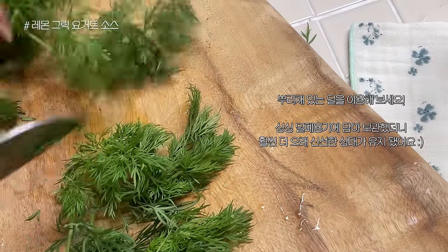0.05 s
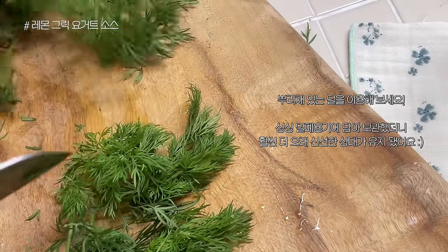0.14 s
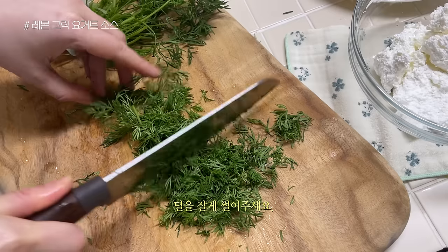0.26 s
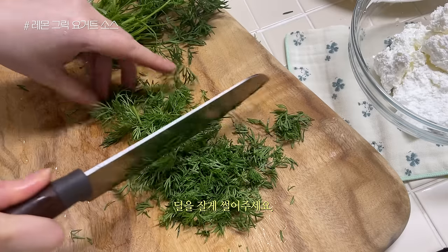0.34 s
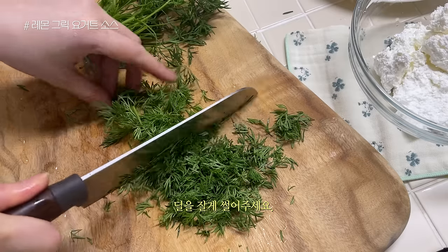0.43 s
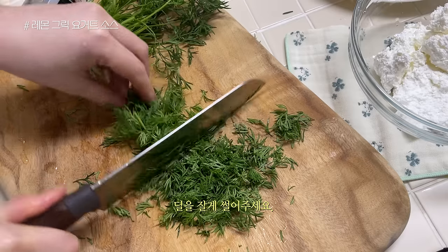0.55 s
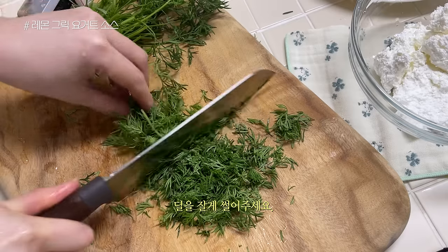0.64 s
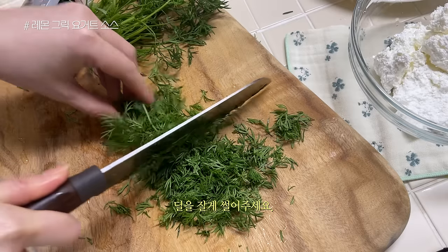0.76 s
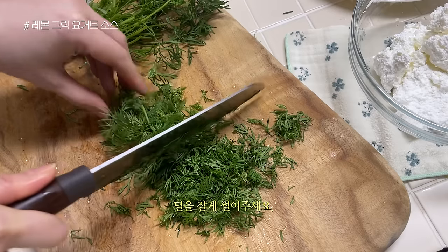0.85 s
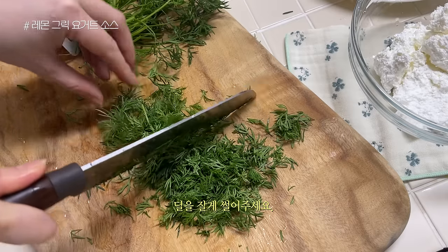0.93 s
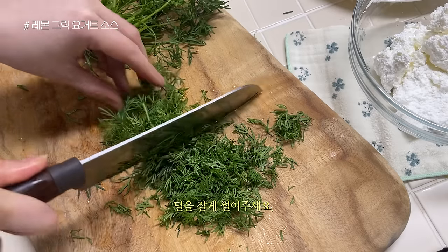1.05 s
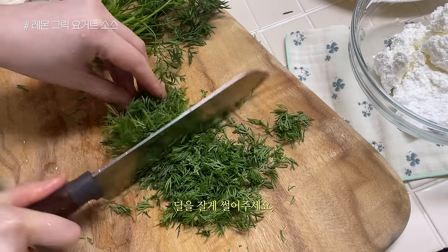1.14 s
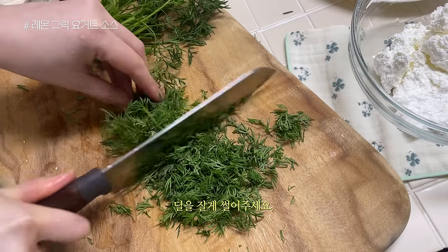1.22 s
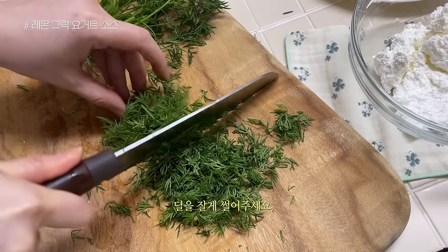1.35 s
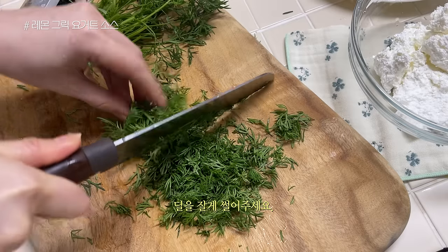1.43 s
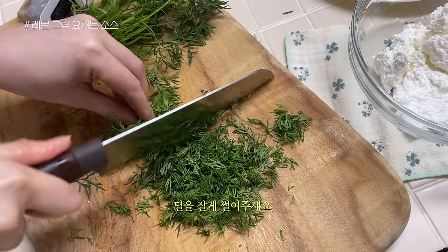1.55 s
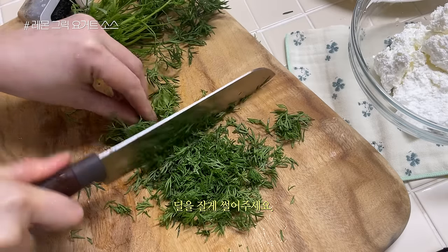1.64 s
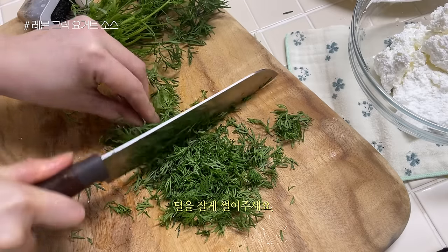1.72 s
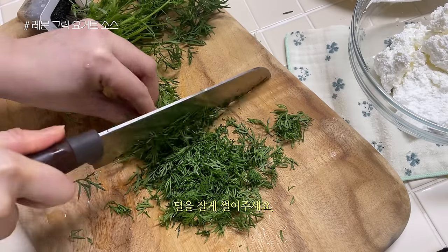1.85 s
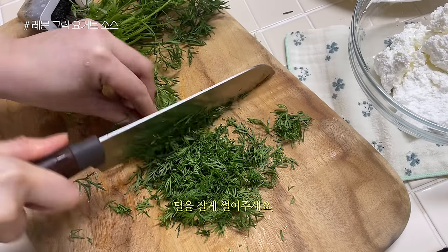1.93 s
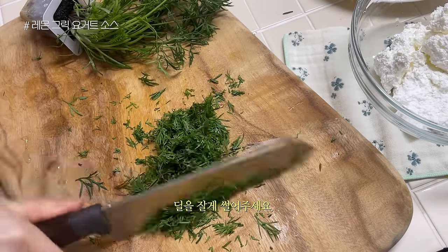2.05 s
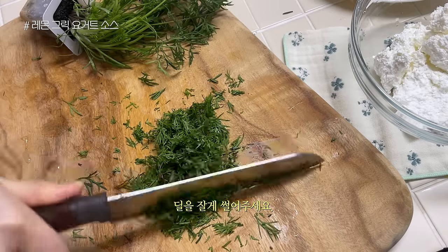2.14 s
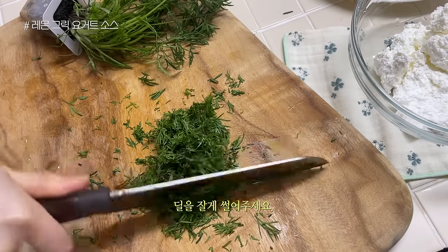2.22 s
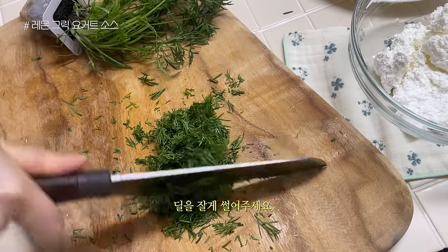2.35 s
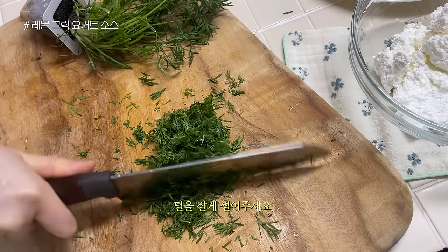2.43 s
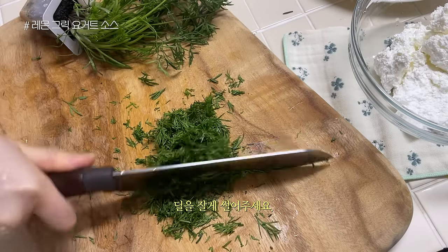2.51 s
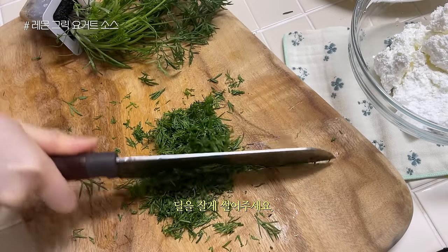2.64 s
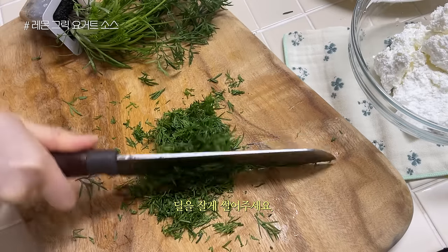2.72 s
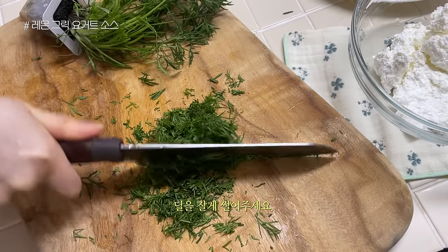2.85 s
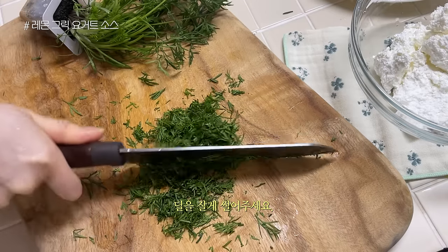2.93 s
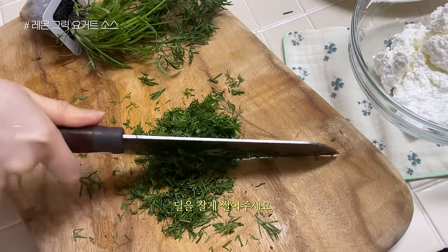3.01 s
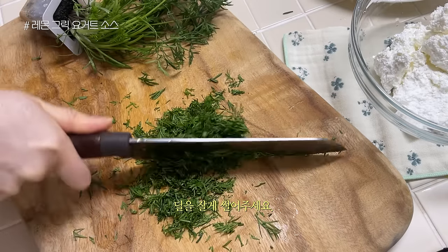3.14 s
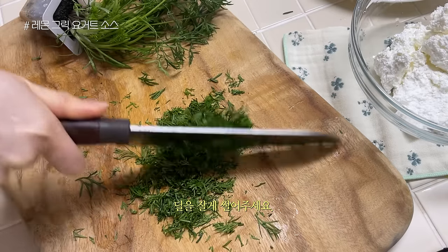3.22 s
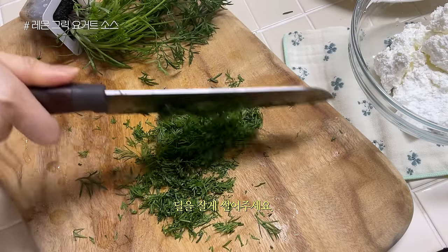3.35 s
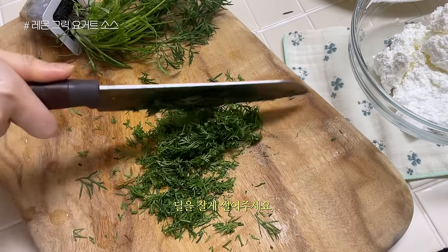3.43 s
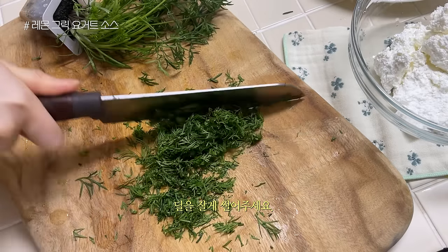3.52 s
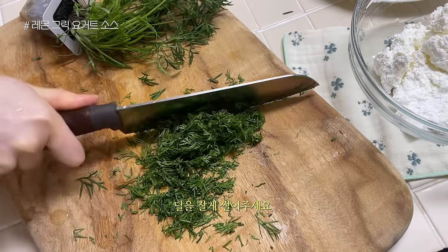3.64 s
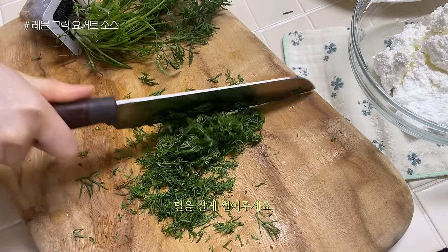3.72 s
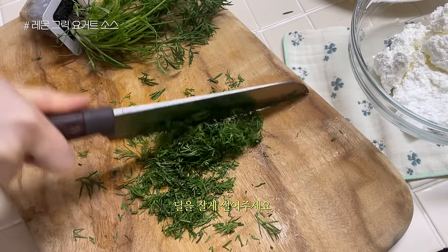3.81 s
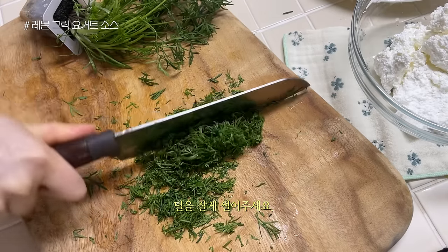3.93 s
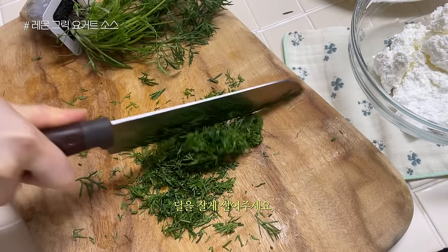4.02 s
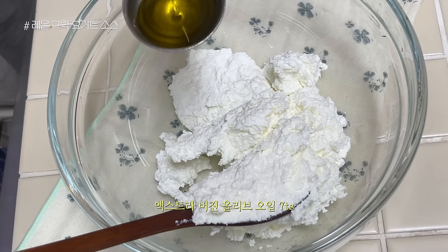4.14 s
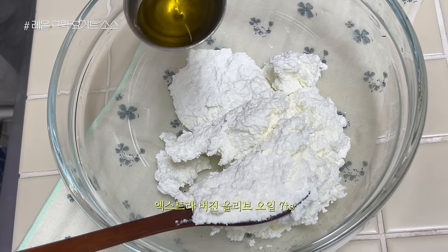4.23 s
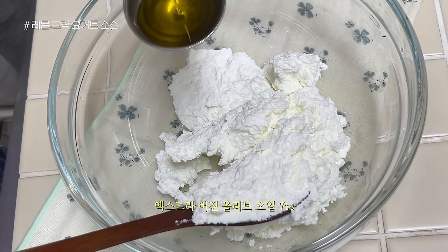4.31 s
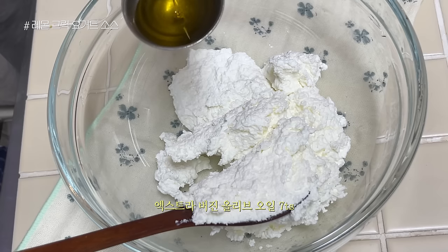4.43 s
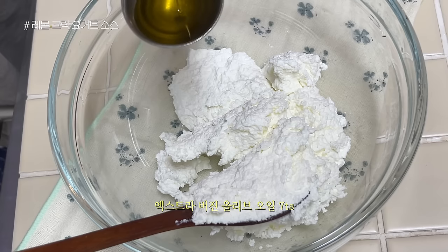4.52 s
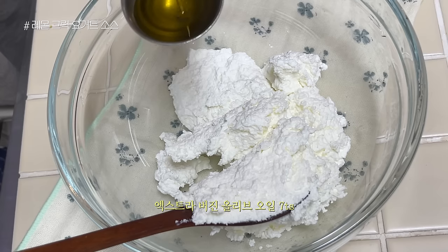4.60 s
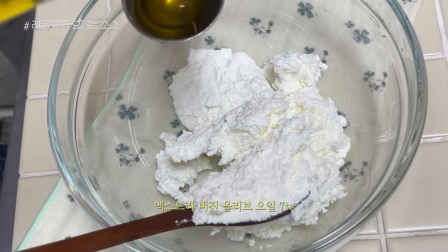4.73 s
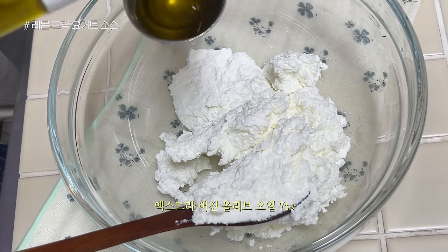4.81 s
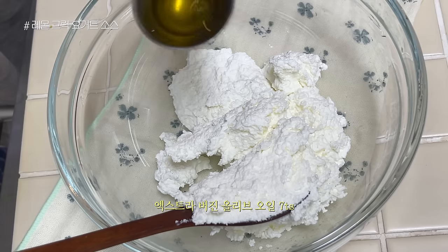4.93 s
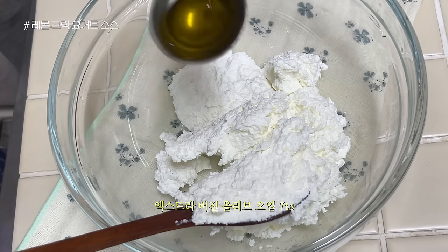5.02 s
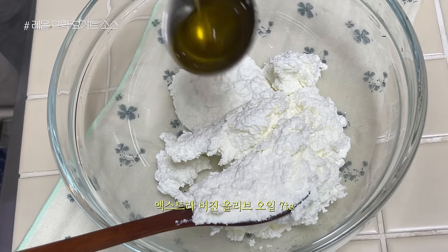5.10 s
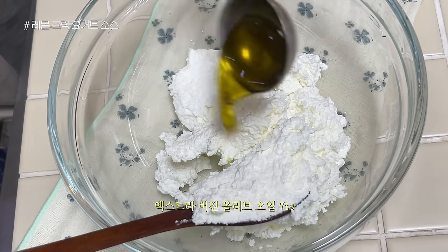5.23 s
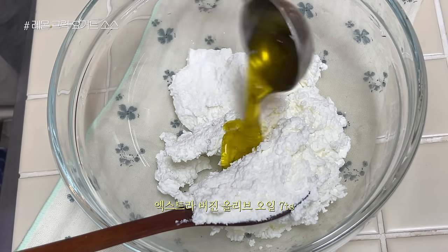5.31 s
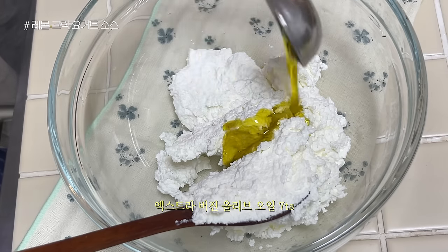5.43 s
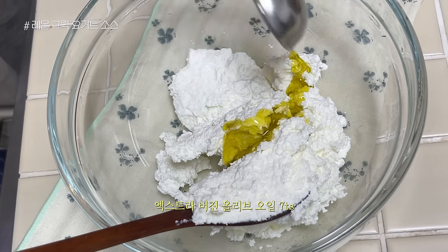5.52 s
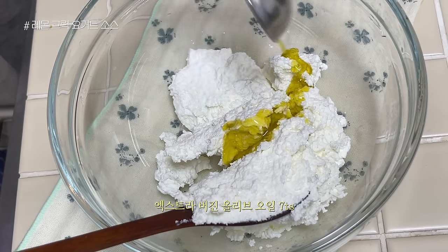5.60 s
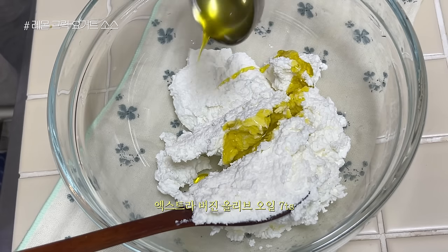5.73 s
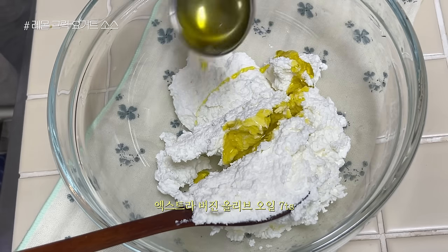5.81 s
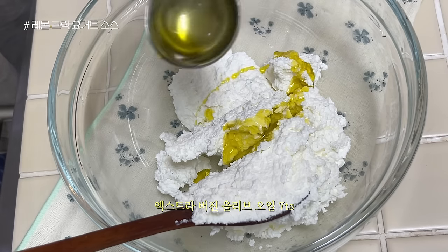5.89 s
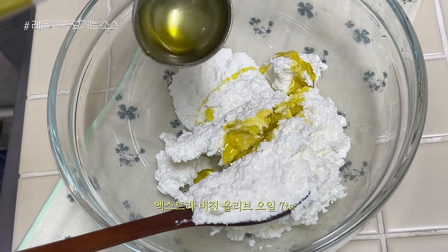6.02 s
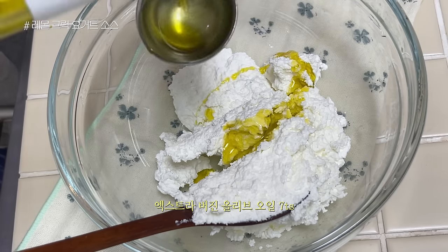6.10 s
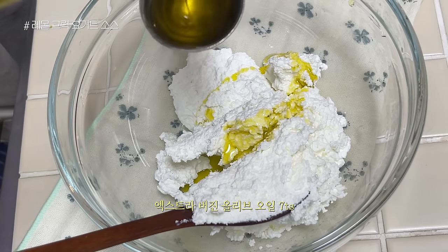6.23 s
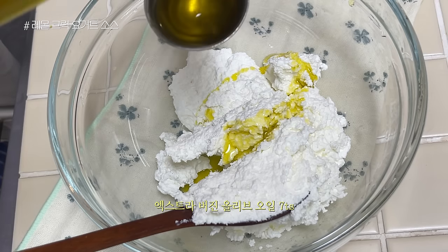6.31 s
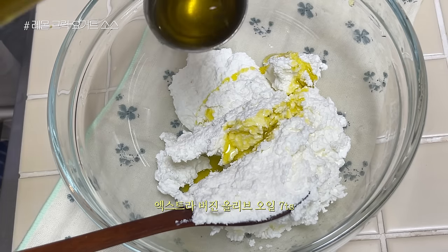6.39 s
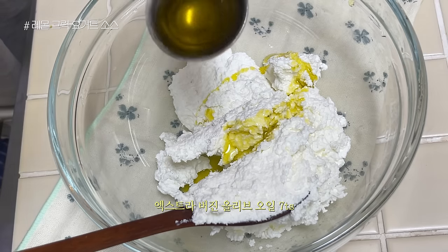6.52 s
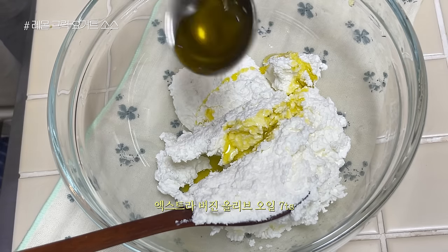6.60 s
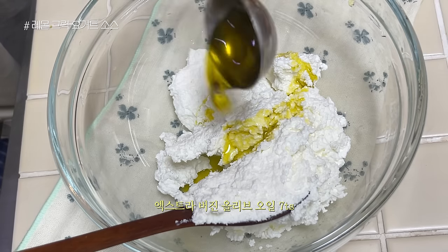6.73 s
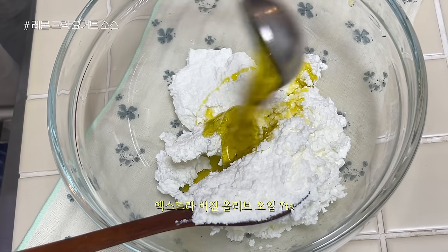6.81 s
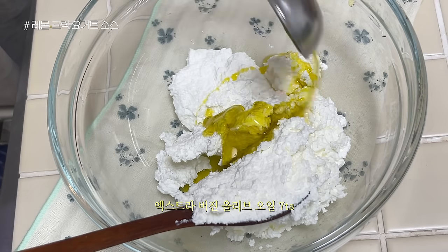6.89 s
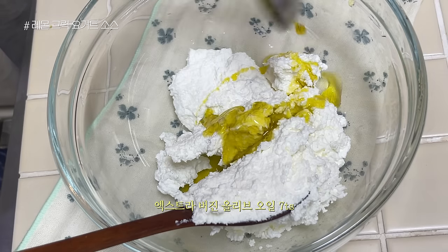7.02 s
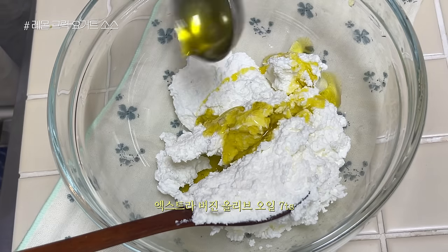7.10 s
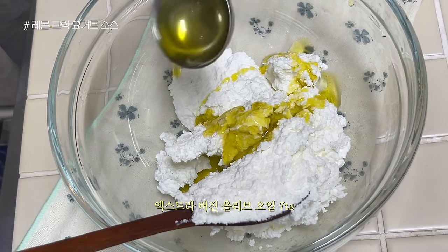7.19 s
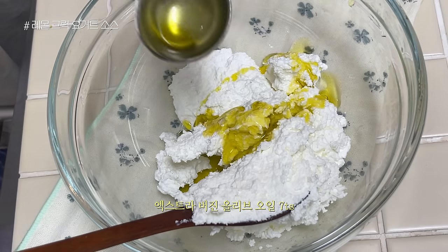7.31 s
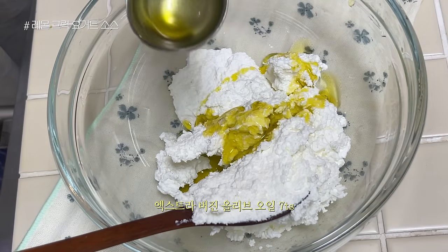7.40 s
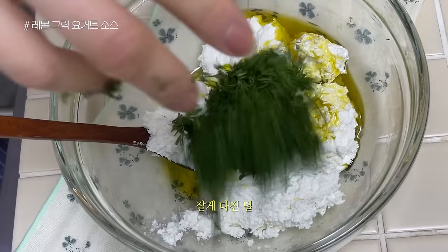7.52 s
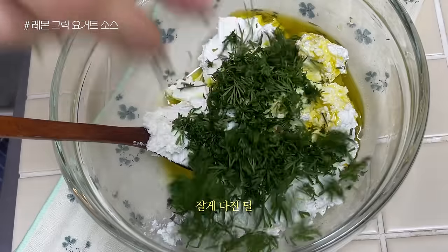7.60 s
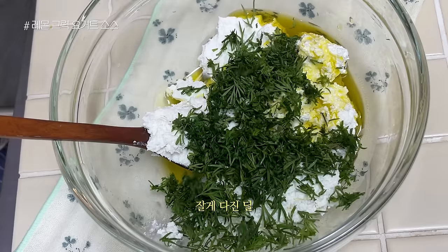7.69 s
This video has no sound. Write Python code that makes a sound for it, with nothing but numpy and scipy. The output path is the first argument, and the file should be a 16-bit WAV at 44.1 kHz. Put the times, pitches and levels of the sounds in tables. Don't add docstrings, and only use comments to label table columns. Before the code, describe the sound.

Close stereo microphone in a small home kitchen: a knife strikes a wooden board with hard woody knocks and blade ring, crunching herb stems. The edge then rocks over the heap with softer crunches and tip taps, juddering once. An abrupt cut leaves a low wavering appliance hum, tiny drips and faint steel spoon clinks, then herbs rustling into a bowl.

```python
import sys
import numpy as np
from scipy import signal
from scipy.fft import rfft, irfft, next_fast_len
from scipy.io import wavfile
from scipy.ndimage import uniform_filter1d, map_coordinates

SR = 44100
rng = np.random.default_rng(int(sys.argv[2]) if len(sys.argv) > 2 else 0)


def wav_out(sig):
    wavfile.write(sys.argv[1], SR, np.round(np.clip(np.atleast_2d(sig).T, -1, 1) * 32767).astype(np.int16))


def linear_from_db(decibels):
    return 10 ** (np.asarray(decibels, float) / 20)


N = 341775
SPAN, HIT = 2 ** 15, 2 ** 14
HZ, T = np.fft.rfftfreq(HIT, 1 / SR), np.arange(HIT) / SR
NOW = np.arange(N) / SR
STEEP = 2

SPLICES = np.array([.278, 2.072, 4.1152, 6.287, 7.535, 8])
# centre_hz, width_hz, level_db
KNOCK = [(576, 190, -10.5), (832.4, 140, 1), (913, 78, 2.5), (1046, 52, -2)]
# centre_hz, width_hz, level_db
BLADE = [(1535, 38, -8), (1613.6, 60, 2.5), (1790, 90, -7), (2000, 88, -13), (2300, 130, -16),
         (2880, 200, -22), (4240, 140, -17), (4680, 130, -25), (5700, 300, -34)]
# centre_hz, width_hz, level_db
EDGE = [(1230, 500, -13.5), (2300, 340, 1), (2850, 350, -1.5), (3270, 560, -22), (4220, 400, -10),
        (6300, 5400, -22)]


def unit(x):
    return x / np.sqrt(np.mean(x ** 2) + 1e-20)


def along(points, hz):
    f, v = np.transpose(points)
    return np.interp(np.log(hz + 1), np.log(f + 1), v)


def over_time(points):
    return np.interp(NOW, *np.transpose(points))


def wobble(rate_hz):
    knots = rng.standard_normal(int(N * rate_hz / SR) + 4)
    return map_coordinates(knots, [np.arange(N) * rate_hz / SR])


def filtered(x, response):
    m = next_fast_len(N + SPAN)
    return irfft(rfft(x, m) * response(np.fft.rfftfreq(m, 1 / SR)), m)[..., :N]


def shaped_noise(noise, spectrum):
    return unit(filtered(noise, lambda f: linear_from_db(along(spectrum, f))))


def modes(table, f, sign=-1, steep=1):
    total = 0
    for k, (centre, width, db) in enumerate(table):
        damping = 1j * f * width * steep
        total = total + sign ** k * linear_from_db(db) * (damping / (centre * centre - f * f + damping)) ** steep
    return total


def varied(table, top_hz, steep=STEEP):
    chance = rng.standard_normal((len(table), 2)) * [.012, 1.5]
    skirts = (1j * HZ / (0.91 * table[0][0] + 1j * HZ) / (1 + 1j * HZ / top_hz)) ** 2
    shifted = [(hz * (1 + a), w, db + b) for (hz, w, db), (a, b) in zip(table, chance)]
    return skirts * modes(shifted, HZ, sign=0.92, steep=steep)


def burst(envelope):
    z = rfft(rng.standard_normal(HIT) * envelope)
    return irfft(z / (np.abs(z) + 1e-12), HIT) * np.sqrt(envelope)


def rung(force, response, db):
    x = irfft(rfft(force) * response, HIT)
    return linear_from_db(db) * x / np.abs(x).max()


def place(starts_s, sounds, room_db, blow_db=-60):
    # frequency_hz, t60_s
    room = [(100, 0.82), (300, 0.74), (1000, 0.12), (1600, 0.47), (4000, 0.39), (12000, 0.18)]
    out, after = np.zeros(N + SPAN), np.arange(SPAN) / SR
    hz, frames = np.fft.rfftfreq(256, 1 / SR), np.arange(180) * 128 / SR
    fading = linear_from_db(-60 * frames / along(room, hz)[:, None])
    first_blow = np.exp(-(T / .0025) ** 2)
    for s, x in zip(starts_s, sounds):
        phases = np.exp(2j * np.pi * rng.random(fading.shape))
        tail = signal.istft(fading * phases, SR, nperseg=256)[1]
        tail *= 1 - np.exp(-after[:len(tail)] / 0.003957)
        sent = linear_from_db(room_db) * x + linear_from_db(blow_db) * x * first_blow
        heard = rfft(x, SPAN) + rfft(sent, SPAN) * rfft(tail / np.linalg.norm(tail), SPAN)
        same_shot = s + after < SPLICES[SPLICES > s][0]
        out[round(s * SR):][:SPAN] += irfft(heard, SPAN) * same_shot
    return out[:N]


def chops():
    # start_s, knock_peak_db,
    # blade_ring_db, crack_db
    slaps = [(0.422, -5, -1.5, -5), (0.49, -52, 8, -20), (0.458, -45, 11, -11.5), (.921, -48, 8, -15),
             (3.466, -58, 8, -20), (3.488, -24, -8, -20), (0.885, -10.5, -2.5, -6.5),
             (1.493, -46, -18.5, -27.5), (1.84, -25.5, -4, -25.5), (3.4765, -6, 3, -27.5)]
    # start_s, knock_peak_db, blade_ring_db, crack_db
    nudges = [(0.129, -42, -12, 12), (1.479, -51, -13, -10.5), (1.587, -44, -12.5, -23),
              (.346, -58, -10, -20), (1.647, -44, -8, -6), (1.682, -25, -12, -1.5), (1.789, -29, -8, 3),
              (1.923, -38, -18, -16)]
    # start_s, knock_peak_db, blade_ring_db, crack_db
    pushes = [(1.149, -13.5, -18.5, 0), (1.668, -17, -15, 4), (1.6725, -14.5, -24.5, -18.5),
              (1.702, -24.5, -17.5, -16.5), (1.995, -15.5, -15, 2), (2.018, -23.5, -31, -9)]
    # start_s, knock_peak_db, blade_ring_db, crack_db
    rocks = [(2.264, -40, -6, -5.5), (2.452, -20, -10.5, -8), (2.458, -22, -8, -8),
             (2.489, -29.5, -15, -10.5), (2.674, -27, -31, -6), (2.707, -31, -51, -25),
             (2.926, -32, -30.5, -15), (3.076, -26, -8.5, -25), (3.119, -39, -10, -12),
             (3.886, -30, -6.5, -4), (4.082, -48, 3, -31), (4.099, -47, -8, -20)]
    # centre_hz, width_hz, level_db
    thud = [(81.5, 16, -3), (150, 100, -1), (227, 31, 1.5), (287, 120, -7.5), (400, 82, -9.5)]
    # blows, board_thud_db, contact_ms, clean first impact (0-1), board pitch ratio under the load
    kinds = [(slaps, -21.5, 0.62, 0.7, .99), (nudges, 0, 0.71, 0.14, .98),
             (pushes, -6, 4.23, 0.395, .9), (rocks, -22, 4.31, 0.25, .98)]
    times, sounds, thuds = [], [], []
    for blows, thud_db, contact_ms, clean, loaded in kinds:
        for s, db, blade_db, crack_db in blows:
            u = T / max(contact_ms, .3) * 1000
            skid, impact = burst(u * np.exp(-3.5 * u)), np.exp(-T / .00004)
            force = (1 - clean) * skid / np.linalg.norm(skid) + clean * impact / impact.sum()
            rocking = burst(T * np.exp(-T / .011))
            knock = rung(force, varied(np.multiply(KNOCK, [loaded, 1, 1]), top_hz=2500), db)
            ring = rung(force, varied(BLADE, top_hz=7000), db + blade_db)
            crack = rung(force * np.exp(-1.5 * u), varied(EDGE, top_hz=9006, steep=1), db + crack_db)
            times.append(s)
            sounds.append(knock + ring + crack)
            thuds.append(rung(rocking, varied(thud, top_hz=556), db + thud_db))
    return place(times, sounds, room_db=-19, blow_db=-11.5) + place(times, thuds, room_db=-9)


def chatter():
    # centre_hz, width_hz, level_db
    judder = [(364, 20, -13), (715, 90, -13), (1070, 88, -2.5), (1520, 120, -9.5), (1595, 93, -0.5),
              (1800, 130, -12), (2930, 130, -17)]
    start_s, slip_hz, rise_hz_per_s = 2.8105, 352.4, 600
    slips = np.arange(6)
    after = slips / slip_hz
    slip_s = after / (1 + .5 * rise_hz_per_s / slip_hz * after)
    force = np.zeros(HIT)
    force[np.round(SR * slip_s).astype(int)] = linear_from_db(-10 * np.exp(-slips / .9) + rng.normal(0, 1.2, len(slips)))
    response = modes(judder, HZ, sign=0.99, steep=STEEP) / (1 + 1j * HZ / 1900) ** 2
    late = T - (2.8305 - start_s)
    squeal = linear_from_db(-14) * np.exp(-(late / 0.0039) ** 2) * np.sin(2 * np.pi * 1582 * late)
    pulses = rung(force, response, -16.5)
    return place([start_s], [pulses], room_db=-13) + place([start_s], [squeal], room_db=-19)


def herbs():
    # start_s, hiss_db,
    # body_db over the hiss, rise_ms for 8 dB
    cuts = [(.11, -53, -20, 21), (0.184, -59, 1.5, 54), (0.425, -51.5, -6, 1), (0.559, -31, 0, 13.5),
            (0.727, -62.5, -20, 14), (0.934, -59, 15.5, 8.5), (1.144, -39, -0.5, 16), (1.241, -60, 15, 64),
            (1.488, -71.5, 17, 20), (1.666, -43.5, 4, 20.5), (1.99, -39, 0, 16), (2.264, -50, 7, 6.5),
            (2.388, -54, 11, 10), (2.452, -33.5, 6, 5), (2.501, -51.5, 9, 17), (2.676, -40, 8, 7.5),
            (2.826, -50, 4, 17), (2.89, -38, 3, 9.5), (2.925, -54.5, 12.5, 11), (3.078, -37, 11, 4),
            (3.127, -53, 11.5, 9), (3.195, -55, 8.5, 4), (3.241, -81, 18.5, 24), (3.481, -43, -7, 2.5),
            (3.593, -39.5, 10, 11), (3.77, -60.5, 6, 35), (3.896, -40.5, 4.5, 11.5), (4.011, -63, 12, 29),
            (4.088, -63, 11, 18), (4.109, -48, 6, 6), (4.1145, -36, -7, 1.8), (.287, -78, 19, 5),
            (.305, -78, 19, 10), (.325, -80, 19, 10), (1.135, -58, 17, 15), (1.65, -55, 10, 4),
            (1.978, -45, 3, 9), (2.004, -47, 6, 2), (2.085, -60, 8, 8), (2.446, -42, -4, 2),
            (2.462, -48, 14, 5), (2.6, -61, 4, 20)]
    # time_s, level_db
    rustle = [(0.0, -69.5), (0.47, -63), (0.59, -42), (0.94, -79), (1.1, -46), (1.41, -67.5), (1.59, -77.5),
              (1.74, -52.5), (2.16, -58.5), (2.43, -54), (2.88, -55), (3.04, -62.5), (3.18, -53.5),
              (3.26, -76), (3.49, -78.5), (3.64, -51), (3.9, -57), (4.11, -62)]
    # frequency_hz, density_db
    hiss_spectrum = [(1800, -42.5), (3000, -17), (5000, -11.5), (7000, -10.5), (9000, -3), (10600, -1),
                     (11700, -0.5), (12500, -7.5), (13300, -17), (15500, -35)]
    # frequency_hz, density_db
    bunch = [(800, -19), (2500, -6), (4000, -10), (6000, 1.5), (8000, -3), (10800, 5.5), (12300, -29),
             (14000, -40)]
    # frequency_hz, density_db
    stems = [(250, -21.5), (500, -5.5), (1000, 2.5), (2200, -14), (3500, -11.5), (6000, -12.5),
             (10000, -35.5)]
    # centre_hz, width_hz, level_db
    sliding = [(2950, 160, 0), (4200, 300, -15)]
    # frequency_hz, density_db
    leaves = [(500, -30.5), (1200, -1), (1800, 2), (3000, -6.5), (5000, -3.5), (8000, -3), (10500, 9.5),
              (12500, -18), (15500, -30.5)]
    fall_ms = 8.5
    body = linear_from_db(over_time(rustle)) ** 2 * (NOW < SPLICES[2])
    hiss = body * linear_from_db(-19.5) ** 2
    for s, db, body_db, rise_ms in cuts:
        settle_db = -24 + 0.84 * min(rise_ms, 25)
        swell = linear_from_db(db - 9200 * np.maximum((s - NOW) / rise_ms, (NOW - s) / fall_ms)) ** 2
        swell += (NOW > s) * linear_from_db(db + settle_db - 220 * np.abs(NOW - s)) ** 2
        swell *= NOW < SPLICES[SPLICES > s - .03][0]
        hiss, body = hiss + swell, body + swell * linear_from_db(body_db) ** 2

    def snaps():
        return rng.standard_normal(N) * linear_from_db(3.5 * wobble(900) + 3 * wobble(70))

    def through_knife(f):
        return modes(KNOCK, f) + linear_from_db(-5) * modes(BLADE, f) + linear_from_db(-11.5) * modes(EDGE, f)

    first_shot = NOW < SPLICES[0]
    bright = np.where(first_shot, shaped_noise(snaps(), bunch), shaped_noise(snaps(), hiss_spectrum))
    woody = unit(filtered(snaps(), through_knife)) + linear_from_db(-6.5) * shaped_noise(snaps(), stems)
    woody = np.where(first_shot, linear_from_db(1.5) * shaped_noise(snaps(), stems), woody)
    slide = unit(filtered(snaps(), lambda f: modes(sliding, f, steep=STEEP)))
    woody = woody + (NOW > SPLICES[1]) * linear_from_db(-13) * slide
    sprigs_db, trickle_db, settle_s = -61, -74.5, 0.09
    fall_db = trickle_db + (sprigs_db - trickle_db) * np.exp(-np.abs(NOW - SPLICES[4]) / settle_s)
    falling = (NOW > SPLICES[4]) * linear_from_db(7.0 + fall_db) * shaped_noise(snaps(), leaves)
    return linear_from_db(2.0) * np.sqrt(hiss) * bright + linear_from_db(-2.0) * np.sqrt(body) * woody + falling


def taps():
    # start_s, peak_db, boom_db
    tip_taps = [(.1295, -33, -14), (.196, -47, -12), (2.134, -36, 0), (2.339, -37.5, 2), (2.569, -40, 1),
                (2.743, -34.5, -5), (2.964, -34.5, -3), (3.16, -32.5, -2.5), (3.714, -41, 2),
                (3.986, -38, -1), (6.149, -44, 0.5)]
    # centre_hz, width_hz, level_db
    tip = [(526, 150, 0.5), (920, 340, -0.5), (1581, 360, -2.06)]
    # centre_hz, width_hz, level_db
    boom = [(54.24, 2.7, 5), (87.5, 5, -8), (150, 22, -12)]
    spread = np.exp(-4j * np.pi * .27 * np.sqrt(HZ))
    sounds = []
    for s, db, boom_db in tip_taps:
        force = burst(np.exp(-T / 0.002605))
        tap = rung(force, spread * varied(tip, top_hz=1500) * modes(tip, HZ), db)
        low = rung(force, spread ** 0.69 * varied(boom, top_hz=250.3), db + boom_db - 1.5)
        sounds.append(tap + low)
    return place(np.transpose(tip_taps)[0] - .0068, sounds, room_db=-14)


def ticks():
    # start_s, peak_db, centre_hz
    high_ticks = [(1.1717, -29.5, 6300), (4.2586, -51, 6500), (4.56, -52, 6700), (4.7476, -61, 5940),
                  (5.2659, -60, 10800), (5.3078, -48.5, 5950), (5.3313, -49, 6060), (5.393, -53, 5740),
                  (5.466, -67, 10000), (5.5436, -59, 5820), (6.1502, -34.5, 5250), (6.2824, -69, 5530),
                  (6.5876, -41, 7400), (6.6134, -58, 7010), (6.625, -52.5, 7060), (6.8474, -60.5, 6050),
                  (7.0623, -55.5, 10730)]
    # start_s, peak_db, centre_hz
    low_ticks = [(6.1766, -52, 2580), (6.2394, -71, 1810), (6.5698, -69, 2530), (6.6444, -68, 2530),
                 (6.8164, -61.5, 2260)]
    # start_s, peak_db, centre_hz, width_hz, t60_s
    odd_ticks = [(1.415, -58, 9470, 1500, .01), (1.9802, -22, 8300, 1500, 0.012),
                 (.13, -29, 2620, 450, .02), (6.572, -64, 7000, 4000, .02),
                 (6.5876, -52, 10800, 1500, .007), (6.625, -58, 10700, 1500, .007),
                 (6.634, -62, 10700, 1500, .007), (6.552, -62, 4700, 60, .12),
                 (2.21, -56.5, 2980, 200, 0.22), (4.45, -70.5, 8900, 500, 0.027),
                 (6.152, -64, 3920, 150, .06), (6.155, -51, 715, 59.8, 0.084), (6.16, -60, 5430, 2500, .13),
                 (6.2362, -62, 5361, 900, .03), (6.2615, -43.5, 6100, 740.7, 0.027),
                 (6.572, -72, 2570, 60, 0.06)]
    rows = [r + (2200, 0.0063) for r in high_ticks]  # width_hz, t60_s
    rows += [r + (580, 0.061) for r in low_ticks]
    rows += odd_ticks
    sounds = []
    for s, db, hz, width_hz, t60 in rows:
        force = burst(linear_from_db(-60 * T / abs(t60)))
        sounds.append(rung(force, modes([(hz, abs(width_hz), 0)], HZ) ** 2, db + 0.5))
    return place(np.transpose(rows)[0], sounds, room_db=-14.5)


def clinks():
    # (frequency_hz, level_db, t60_s)
    rings = [
        (5.051, -45.5, 0.035, 0.1, [(2576, -18, 0.088), (4720, -26.5, 0.077), (5710, -8, 0.06), (6050, -8, .05), (6400, -10, 0.05), (7100, -12, .03), (8600, 0, 0.025), (9900, 0, 0.06), (10170, 10, 0.04), (10800, 0, .05), (11270, -1, 0.04)]),
        (6.52, -57.5, 0.035, 0.25, [(487.4, 4, 0.19), (996, -4, 0.39), (4790, -5, 0.2), (5620, -2, .13), (7040, -2, 0.12), (10700, -6, 0.04)]),
    ]
    sounds = []
    for s, db, wander, sag, table in rings:
        ring = np.zeros(HIT)
        for hz, level, t60 in table:
            drift = np.cumsum(rng.standard_normal(HIT)) * wander
            ring += linear_from_db(level - 60 * T / t60) * np.sin(2 * np.pi * hz * T * (1 - sag * T) + drift)
        sounds.append(linear_from_db(db) * ring * (1 - np.exp(-T / 0.00043)))
    return place([r[0] for r in rings], sounds, room_db=-10, blow_db=-3)


def kitchen():
    # time_s, level_db
    bustle = [(0.0, -74.5), (0.43, -61), (0.58, -47), (0.73, -70.5), (0.91, -53.5), (1.1, -59.5),
              (1.57, -63), (1.88, -54), (2.14, -57), (2.31, -56), (2.98, -51), (3.17, -50), (3.28, -62.5),
              (3.93, -53.5), (4.1, -59), (5.39, -61.5), (6.0, -62.5), (7.06, -66.5)]
    # frequency_hz, density_db
    rumble = [(18, -32), (30, -3.5), (43, -3), (54, 2), (113, -8.5), (150, -13), (200, -41), (330, -120)]
    # frequency_hz, density_db
    air = [(88, -38.5), (150, -5), (263, -4.5), (294, -8), (403, -15), (426, -18), (718, -18), (780, -15.5),
           (1180, -24.5), (1780, -28), (4000, -54.5), (5200, -75.5), (8800, -120)]
    shot_air_db = [-68.5, -66, -63.5, -63.5, -68.5, -67]
    # frequency_hz, density_db
    self_noise = [(1500, -4.5), (3000, -6), (7000, -3), (10500, 3.5), (12500, -5), (15500, -24.5)]
    # peak_s, level_db
    swells = [(4.13, -50.5), (4.8, -50), (5.32, -53.5), (5.56, -59), (6.02, -52.5), (6.22, -59)]
    # start_s, end_s, pitch_hz, level_db
    whine = [(3.1, 4.117, 10550, -94), (4.117, 7.535, 10400, -99)]
    shot = np.searchsorted(SPLICES, NOW)
    rumble_db = over_time(bustle)
    busy_db = rumble_db - (np.bincount(shot, rumble_db) / np.bincount(shot))[shot]
    air_db = np.array(shot_air_db)[shot] + 0.44 * busy_db - 0.7 * (shot == 3) * (NOW - SPLICES[2])

    def noise(spectrum):
        return shaped_noise(rng.standard_normal(N), spectrum)

    rise_db_per_s, fall_db_per_s = 32.5, 93
    hum_db = np.max([db - np.maximum(rise_db_per_s * (s - NOW), fall_db_per_s * (NOW - s))
                     for s, db in swells], axis=0)
    hum_phase = 2 * np.pi * np.cumsum(189.5 + 2.5 * wobble(15.0)) / SR
    hum = (shot == 3) * np.sqrt(2) * linear_from_db(hum_db) * np.sin(hum_phase)
    for start, end, hz, db in whine:
        hum += (NOW > start) * (NOW < end) * linear_from_db(db) * np.sin(2 * np.pi * hz * NOW + 3 * wobble(33))
    low = linear_from_db(rumble_db + 4 + 1.1 * wobble(5.9)) * noise(rumble)
    room_air = linear_from_db(air_db + 5.0 + 0.96 * wobble(10)) * noise(air)
    return low + room_air + hum + linear_from_db(-82) * noise(self_noise)


def scene():
    # frequency_hz, level_db
    apart = [(60, -42), (130, -28), (300, -15), (600, -14), (1200, -21), (2500, -19), (5000, -22),
             (10000, -28)]
    # frequency_hz, level_db
    diffuse = [(60, -30), (130, -22), (300, -13), (640, -3), (1400, -6), (3000, -13), (6000, -24)]
    near = chops() + chatter() + herbs() + taps() + ticks() + clinks()
    far = kitchen()
    scatter = burst(T * np.exp(-T / .006))[:SPAN // 8]
    scatter /= np.linalg.norm(scatter)
    shot = np.searchsorted(SPLICES, NOW)
    strewn = np.zeros(N)
    for k in range(len(SPLICES)):
        strewn += (shot == k) * signal.fftconvolve(near * (shot == k), scatter)[:N]
    other = filtered(strewn, lambda f: linear_from_db(along(apart, f)))
    other += filtered(np.roll(far, SR // 16), lambda f: linear_from_db(along(diffuse, f)))
    return np.array([near + far + other, near + far - other])


def top_cut(x):
    return signal.sosfilt(signal.butter(12, 16310, fs=SR, output="sos"), x)


def record(dry):
    # frequency_hz, phase_rad
    lead = [(0, 0), (780, 0.5), (1380, 0.25), (1750, .2), (2840, 0.65), (4130, 0.95), (4620, 1.3),
            (4900, 2.5), (5300, 4.5), (5860, 6.1), (6800, 6.8), (9040, 9.3), (10200, 9.7), (12600, 12.3),
            (14500, 12.8), (15800, 14.5)]
    # frequency_hz, level_db
    tilt = [(60, -0.5), (110, -0.5), (200, -2.0), (380, -3.0), (700, -2.0), (1290, 1.0), (1750, .8),
            (2700, -1.0), (3300, .5), (4400, -0.5), (8120, 0.0), (15000, 0.0)]
    sides = np.array([[.5], [-.5]])

    def port_response(f):
        band_pass = (f < 15830) / (1 + (42 / (f + 1)) ** 6)
        phase = sides * np.interp(f, *np.transpose(lead))
        return linear_from_db(sides * along(tilt, f)) * np.exp(1j * phase) * band_pass

    ports = filtered(dry, port_response)
    ports /= (1 + np.abs(ports / .93) ** 8) ** (1 / 8)
    hz, _, z = signal.stft(ports, SR, nperseg=1024)
    band = uniform_filter1d(np.mean(np.abs(z) ** 2, axis=0), size=17, axis=0)
    floor_db = -107 + 6 * (hz[:, None] - 11800) / 1000
    kept = (hz[:, None] < 11500) | (band > linear_from_db(floor_db) ** 2)
    mix = signal.istft(z * kept, SR, nperseg=1024)[1][:, :N]
    return top_cut(mix)


dry = scene()
out = record(dry)
wav_out(out)
```